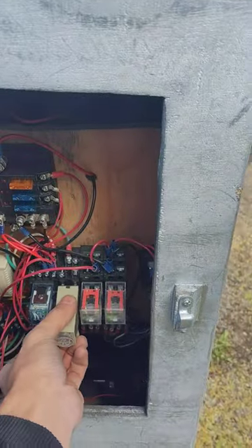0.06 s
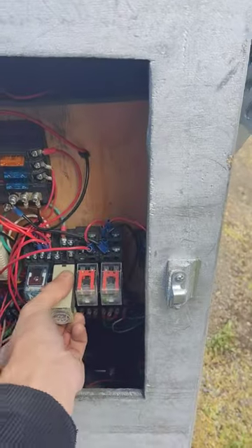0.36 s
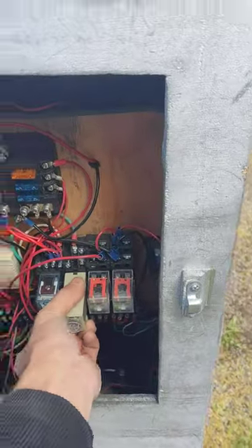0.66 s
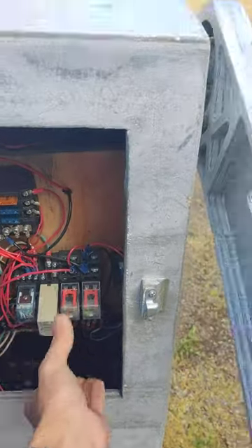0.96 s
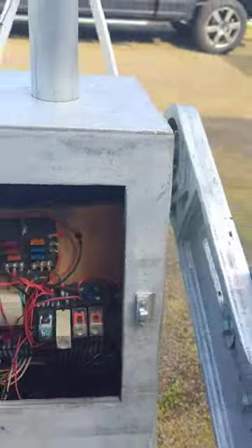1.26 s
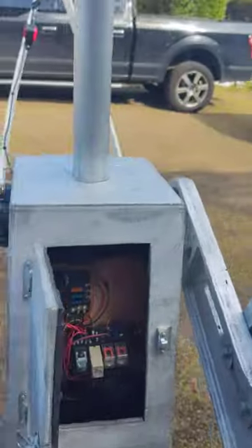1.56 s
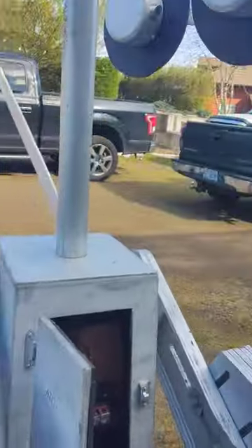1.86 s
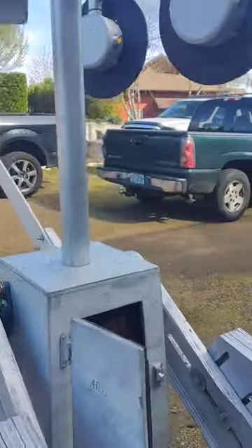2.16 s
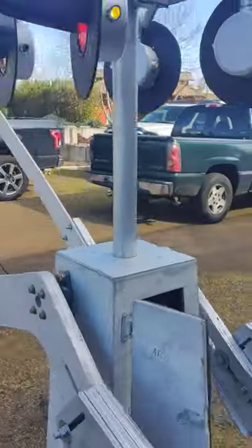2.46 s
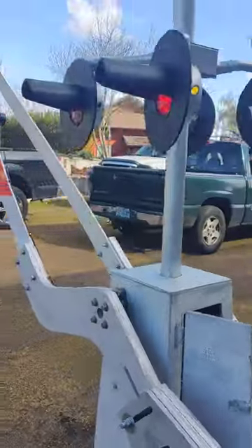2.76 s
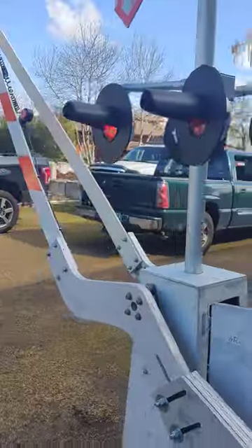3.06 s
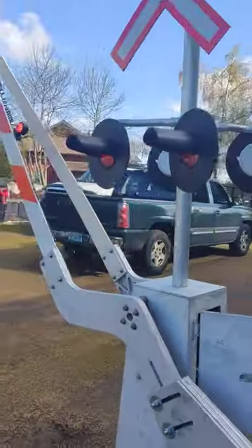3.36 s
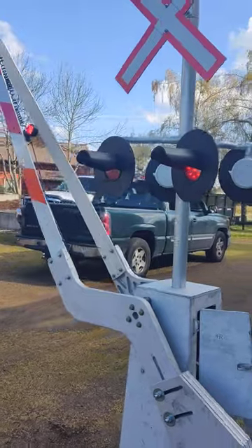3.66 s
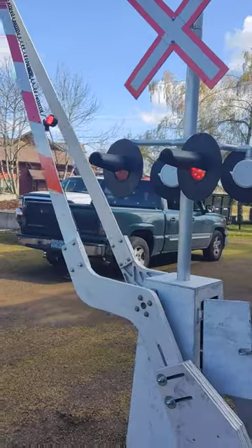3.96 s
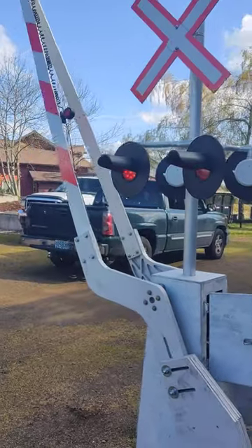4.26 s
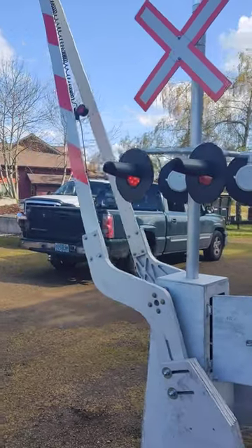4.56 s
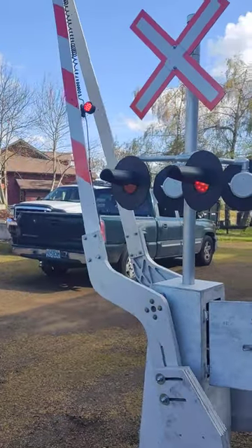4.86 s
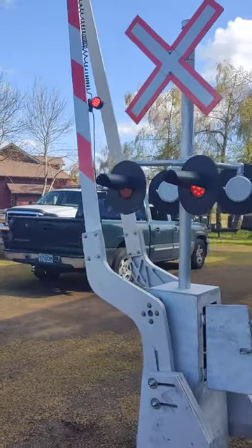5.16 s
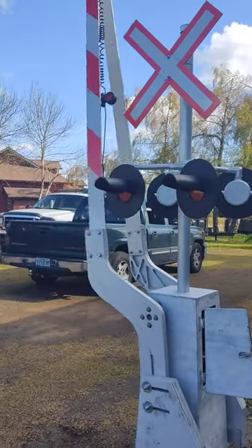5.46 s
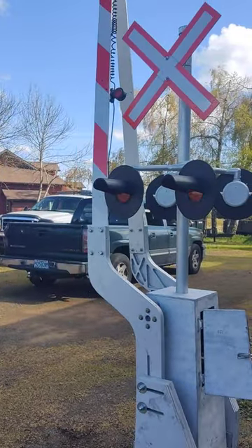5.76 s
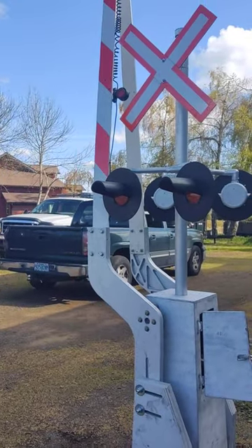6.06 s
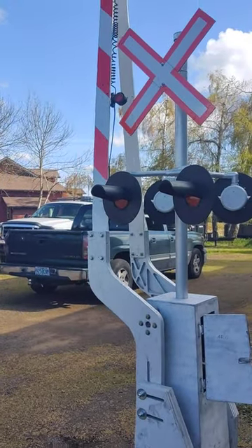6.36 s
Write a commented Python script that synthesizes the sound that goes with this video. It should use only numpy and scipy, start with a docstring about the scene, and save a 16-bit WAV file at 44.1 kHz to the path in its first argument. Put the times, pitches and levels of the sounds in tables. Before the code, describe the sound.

Outdoors, light wind bumps the microphone as a relay starts clicking in an uneven beat. A small geared motor whines, grinds and hisses, sagging twice as it lifts a model crossing gate. The motor and clicks grow fainter as the microphone backs away. Past halfway the dry pivot rubs and squeaks thinly, then the motor stops and the arm knocks softly home.

```python
"""A light wind bumps the microphones throughout, over faint distant outdoor noise.
A flasher relay starts clicking in an uneven beat, and a small linear actuator lifts a model crossing gate.
Its geared motor whines, grinds and hisses, sagging twice under the rocking arm as the listener backs away.
Past halfway the dry pivot rubs and squeaks. A limit switch stops the motor, and the arm knocks home."""
import sys
import numpy as np
from scipy import signal
from scipy.fft import rfft, irfft
from scipy.io import wavfile

SR = 44100
rng = np.random.default_rng(int(sys.argv[2]) if len(sys.argv) > 2 else 0)


def store_wav(level_fs):
    """Save 16-bit WAV to argv[1]."""
    pcm = np.round(np.clip(np.atleast_2d(level_fs), -1, 1) * 32767)
    wavfile.write(sys.argv[1], SR, pcm.T.astype(np.int16))


N = 283061
TIME = np.arange(N) / SR
BIN_HZ = np.fft.rfftfreq(512, 1 / SR)[:, None]
CUT_S = 5.612  # the limit switch opens
# The listener's way from the cabinet (0) to the far spot (1): time_s, share
AWAY = [(1.6, 0.31), (2.3, 0.55), (3.2, 0.62), (3.7, 0.89)]


def amp(db):
    """Decibels to gain."""
    return 10 ** (np.asarray(db) / 20)


def unit(x):
    """Scales to rms 1."""
    return x / np.sqrt(np.mean(x ** 2) + 1e-20)


def curve(rows, t=TIME):
    """The columns of a table at the times t."""
    times, *columns = np.transpose(rows)
    return [np.interp(t, times, c) for c in columns]


def colour(rows, hz):
    """The columns of a table at the frequencies hz."""
    freqs, *columns = np.transpose(rows)
    return [np.interp(np.log(hz + 1), np.log(freqs), c) for c in columns]


def add(mix, start_s, sound):
    """Mixes a stereo sound in."""
    part = mix[:, max(round(start_s * SR), 0):][:, :sound.shape[1]]
    part += sound[:, :part.shape[1]]


def sides(pan_db):
    """Stereo gains of mean power 1; pan_db is left minus right."""
    pair = np.array([amp(pan_db / 2), amp(-pan_db / 2)]).reshape(2, -1)
    return pair / np.sqrt(np.mean(pair ** 2, 0))


def wander(hz):
    """Random drift of rms 1, up to about hz."""
    rolloff = 1 + (np.fft.rfftfreq(N, 1 / SR) / hz) ** 4
    return unit(irfft(rfft(rng.standard_normal(N)) / rolloff, N))


def noise(rows):
    """Noise of rms 1 with a given spectrum."""
    gain = amp(colour(rows, np.fft.rfftfreq(N, 1 / SR))[0])
    return unit(irfft(rfft(rng.standard_normal(N)) * gain, N))


def frames(x):
    """Frame times and short-time spectra."""
    return signal.stft(x, SR, nperseg=512, noverlap=384)[1:]


def sound_of(spectra):
    """Short-time spectra back to sound."""
    return signal.istft(spectra, SR, nperseg=512, noverlap=384)[1][..., :N]


def ring(modes, t, detune=0.028):
    """Dying modes after one blow, each slightly detuned."""
    out = np.zeros(len(t))
    for hz, db, t60 in modes:
        pitch_hz = hz * (1 + detune * rng.standard_normal())
        out += amp(db - 60 * t / t60) * np.sin(2 * np.pi * (pitch_hz * t + rng.random()))
    return out


def envelope(start_s, length_s, rise_s, fall_s):
    """A straight rise, a hold and an exponential release."""
    attack = np.clip((TIME - start_s) / rise_s + .5, 0, 1)
    return attack * np.exp(-np.maximum(TIME - start_s - length_s, 0) / fall_s)


def wind(level_db=-1, lump_db=3, lull_db=-48, gust_db=-31):
    """Lumpy turbulence, unrelated at the two microphones and brighter in gusts."""
    # Breeze between gusts: time_s, level_db, pan_db
    breeze = [(0, -40.5, 1), (1.1, -43.5, 6), (2.0, -37.5, -8.5), (3.0, -43, -15), (3.5, -42.5, -7),
              (4.15, -48.5, -11), (5.4, -45.5, -3.5), (5.85, -53.5, -2.5), (6.42, -53.5, 3)]
    # Gusts on the microphones: start_s, length_s, level_db, pan_db
    gusts = [(0, 0.013, -33.5, 20), (0.193, 0.21, -32.5, 4.5), (0.55, 0.31, -33, 21),
             (1.06, 0.062, -32.5, 11), (1.268, 0.24, -32, -17), (1.524, 0.13, -33.5, -1),
             (1.65, 0.24, -38, -20), (2.185, 0.12, -34, -20), (2.47, 0.31, -30.5, -26),
             (2.798, 0.28, -36.5, -7.5), (3.449, 0.42, -47, -6), (4.536, .06, -42, -30),
             (4.761, .13, -43, -27), (5.25, 0.15, -45, -5), (5.658, 0.033, -41.5, 3),
             (5.884, 0.038, -43, 9)]
    # Colour of the wind: freq_hz, lull_db, gust_db
    tone = [(20, -36, -37), (40, -19, -36), (64, -1.5, -8.5), (87, 6.5, -1.5), (148.3, 4, 0.5),
            (219, -8, -2.5), (346, -29.5, -10.5), (510, -38, -18.5), (840, -45, -43.5),
            (2000, -68.5, -57.5)]
    db, pan_db = curve(breeze)
    power = (amp(db) * sides(pan_db)) ** 2
    for start_s, length_s, db, pan_db in gusts:
        power += (amp(db) * sides(pan_db) * envelope(start_s, length_s, rise_s=0.0083, fall_s=0.041)) ** 2
    strength = np.clip((10 * np.log10(power.mean(0)) - lull_db) / (gust_db - lull_db), 0, 1)
    lull, gust = np.array(tone)[:, [0, 1]], np.array(tone)[:, [0, 2]]
    air = np.zeros((2, N))
    for side in range(2):
        blend = np.sqrt(1 - strength) * noise(lull) + np.sqrt(strength) * noise(gust)
        air[side] = unit(blend * amp(lump_db * wander(42)))
    return amp(level_db) * np.sqrt(power) * air


def outdoors(level_db=-65.5):
    """A faint, steady bed of distant noise."""
    # Colour of the distance: freq_hz, level_db
    tone = [(120, -7), (300, -2.5), (700, -4), (1050, -6), (1550, -8.5), (1930, -4), (2600, -17),
            (4500, -21), (8000, -25), (16000, -28)]
    return amp(level_db) * np.array([noise(tone), noise(tone)])


def buffets(level_db=-1, decay_cycles=0.28):
    """The strongest eddies bump the microphones with single short swings of pressure."""
    # Eddies: centre_s, level_db, pan_db, pitch_hz
    eddies = [(0.171, -20, 26, 135), (0.585, -8, 7, 193), (0.789, -14, 26, 137), (0.88, -14, 32, 122),
              (1.102, -10, 13, 174.7), (1.371, -15, -9, 120), (1.829, -17.5, -29, 174),
              (2.216, -15.5, -15, 232), (2.538, -14, -35, 233), (2.588, -12.5, -29, 250),
              (2.643, -9, -28, 210), (2.71, -19, -26, 126), (2.772, -14.5, -23, 130),
              (3.238, -20.5, -21, 162), (4.571, -20, -17, 120), (4.785, -20.5, -20, 126),
              (5.303, -14, 24, 135), (5.385, -24, 11, 156), (5.8, -28, 10, 163), (5.896, -24, 20, 116.7),
              (6.037, -35.5, 11.5, 137)]
    out, t = np.zeros((2, N)), np.arange(-SR // 20, SR // 20) / SR
    for centre_s, db, pan_db, hz in eddies:
        bump = np.exp(-abs(t) * hz / decay_cycles) * np.sin(2 * np.pi * hz * t)
        polarity = rng.choice([-1, 1], (2, 1))
        add(out, centre_s + t[0], amp(db + level_db) * sides(pan_db) * polarity * bump)
    return out


def relay(level_db=-3, crack_t60=0.037, body_t60=0.072, cabinet_t60=0.4, bounce_s=0.0089, bounce_db=-9):
    """The armature snaps over and bounces once; from afar the cabinet's ring is a larger share."""
    # Relay and switch clicks: start_s, level_db, body_db, pan_db
    clicks = [(.171, -41, -4, -9), (0.189, -28, 0, -5), (.224, -36.5, -4, -17), (0.2416, -21, -14, -9),
              (0.4427, -10.5, -19, -13), (0.9991, -3.5, -35, -7.5), (1.7447, -14, -28, -18),
              (2.2994, -17.5, -18, -14), (3.0225, -31.5, -20, -17), (3.0463, -31, -6, -14),
              (3.6007, -32, -13, -12), (4.346, -41.5, 7.5, -6), (4.898, -35, -13, -11), (5.635, -45, 9, -9)]
    # The relay's ring: pitch_hz, level_db, t60_s
    modes = [(3650, -15, 0.17), (4200, -16, 0.026), (4660, -0.5, 0.021), (5935, -5.5, .03), (6720, -6, .04),
             (9130, -2, .022), (9324, 1.5, 0.041), (10640, -6, 0.034), (14700, -8, 0.024)]
    out, t = np.zeros((2, N)), TIME[:SR // 8]
    bright = signal.butter(2, 3000, "high", fs=SR)
    dull = signal.butter(2, [500, 2500], "band", fs=SR)
    panel = signal.butter(2, [3300, 4600], "band", fs=SR)
    for start_s, db, body_db, pan_db in clicks:
        crack, body, cabinet = rng.standard_normal((3, 2, len(t)))
        away = curve(AWAY, start_s)[0]
        snap = np.array([ring(modes, t), ring(modes, t)]) / 2
        snap += amp(-2 - 60 * t / crack_t60) * signal.lfilter(*bright, crack)
        snap += amp(body_db - 60 * t / body_t60) * unit(signal.lfilter(*dull, body)) / 2
        snap += away ** 2 * amp(-11 - 60 * t / cabinet_t60) * unit(signal.lfilter(*panel, cabinet))
        snap *= amp(db + level_db) * sides(pan_db) * (1 - np.exp(-t / .0005))
        add(out, start_s, snap)
        add(out, start_s + bounce_s, amp(bounce_db) * snap)
    return out


def speed(braking_hz_per_s=240):
    """Shaft turns per second: sways as the arm rocks, less each time, and runs down after the cut."""
    # Turning points of the rocking: time_s, shaft_hz
    turning_points = [(.18, 63.25), (.59, 48.05), (1.22, 68.4), (1.56, 68), (1.99, 54.87), (2.49, 64.64),
                      (2.97, 60.23), (3.21, 62.16), (3.91, 60.5), (4.24, 62.12), (4.98, 60.03),
                      (5.31, 60.62), (5.76, 58.76)]
    times, shaft_hz = np.transpose(turning_points)
    index = np.arange(len(times))
    place = np.interp(TIME, times, index)
    eased = np.floor(place) + (1 - np.cos(np.pi * (place % 1))) / 2
    lost_hz = braking_hz_per_s * np.maximum(TIME - CUT_S, 0)
    return np.maximum(np.interp(eased, index, shaft_hz) - lost_hz, 0)


def load(t, rise_s=.18, fall_s=0.17):
    """How hard the arm bears on the motor: 0 free, 1 labouring."""
    # The arm bears down: start_s, length_s, load_share
    strains = [(.33, 0.63, 0.96), (1.781, 0.38, 0.77), (2.76, .25, 0.2), (4.8, 1, 0.18)]
    return sum(share * np.clip(np.minimum((t - start) / rise_s, (start + length - t) / fall_s) + .5, 0, 1)
               for start, length, share in strains)


def loudness(free_db, load_db, doubling_db):
    """Gain of a motor voice: free_db at 1 m, plus load_db at full load, doubling_db per distance doubling."""
    # The listener backs away: time_s, distance_m
    walk = [(.3, 0.45), (.9, 0.4), (1.6, 0.87), (2.4, 1.01), (3.2, 1.24), (3.7, 1.49), (5.6, 2.3)]
    return amp(free_db + load_db * load(TIME) + doubling_db * np.log2(curve(walk)[0]))


def radiate(drive, tone):
    """Colours a drive by load and distance, keeping its power."""
    t, spectra = frames(drive)
    loaded_db, free_db, far_db = colour(tone, BIN_HZ)
    near_db = free_db + load(t) * (loaded_db - free_db)
    away = curve(AWAY, t)[0]
    gain = amp((1 - away) * near_db + away * far_db)
    return sound_of(spectra * gain / np.sqrt(np.mean(gain ** 2, 0)))


def swell(harmonic):
    """Gain of one harmonic of the whine as echoes lift or cancel it along the walk."""
    # Swells and dips: centre_s, half_length_s, harmonic, gain_db
    swells = [(0.587, 0.049, 3, -5.5), (0.596, 0.058, 4, 1.5), (1.171, 0.17, 5, 9), (1.55, 0.13, 5, -4.5),
              (1.952, .35, 1, -3.5), (2.493, 0.16, 1, 4.5), (2.606, 0.5, 7, 2), (2.994, 0.091, 1, -4.5),
              (3.195, 0.12, 7, 4.5), (3.596, 0.24, 7, -16), (3.853, 0.13, 1, 6.5), (4.3, 0.12, 6, 8),
              (4.34, 0.16, 1, -9.5), (4.8, 0.38, 7, 6.5), (1.151, .1, 1, -7), (1.687, 0.1, 1, -8),
              (2.23, 0.075, 7, 5.5), (0.928, 0.064, 3, 4), (3.255, 0.15, 2, -6)]
    return amp(sum(db * np.exp(-((TIME - centre_s) / half_s) ** 2)
                   for centre_s, half_s, k, db in swells if k == harmonic))


def whine(turns, teeth=12, swing_rad=0.11, flutter=0.42, low_fading_db=0.43, high_fading_db=2.7):
    """Gear teeth mesh; the off-centre pinion swings their timing and force, giving sidebands."""
    # Gearbox response for harmonics 1-3: freq_hz, gain_db
    gearbox = [(570, 1), (640, 3), (735, 2), (820, 5.5), (1140, 0.5), (1270, 1.5), (1450, 3.5), (1650, 5),
               (1720, -3.5), (1900, 5), (2150, 7.5), (2450, 2)]
    # Housing response for the higher harmonics: freq_hz, near_db, far_db
    housing = [(2380, 9, -0.5), (3130, -6, 2.5), (3640, -14, -19), (4040, 3, -5.5), (4600, 0, -0.5),
               (4640, -1.5, -4.5), (4750, -8, 0), (5400, 9.5, 1.5), (5620, 3, -21.5), (6160, -11, -4),
               (6440, -6, -22), (8500, -8.5, -18.5), (10000, -18.5, -14.5)]
    shaft = 2 * np.pi * turns
    slip = (.06 + .05 * load(TIME)) * wander(40)
    mesh = teeth * shaft + swing_rad * np.sin(shaft + 1.1 * wander(4.2)) + slip
    mesh_hz, away = teeth * speed(), curve(AWAY)[0]
    low = loudness(free_db=-53, load_db=24.04, doubling_db=-1.7)
    high = loudness(free_db=-49.5, load_db=2.7, doubling_db=-8)
    force = 1 + 0.064 * np.cos(shaft) + 0.097 * np.sin(2 * shaft)
    shake, fading = wander(83), wander(3)
    out = np.zeros(N)
    for k in range(1, 15):
        rough = flutter * np.roll(shake, rng.integers(N))  # each harmonic shakes on its own
        fade = np.roll(fading, rng.integers(N))  # and swells as reflections shift with the walk
        if k <= 3:
            gain = low * amp(colour(gearbox, k * mesh_hz)[0] + low_fading_db * fade)
        else:
            near_db, far_db = colour(housing, k * mesh_hz)
            gain = high * amp(near_db + away * (far_db - near_db) + high_fading_db * fade)
        out += gain * swell(k) * unit((force + rough) * np.cos(k * mesh + 2 * np.pi * rng.random()))
    return out


def growl(turns, body_hz=535, width_hz=190):
    """Under load each turn jolts the gearbox; shaft orders around the mesh tone rattle its lowest mode."""
    shaft_hz, rattle = speed(), np.zeros(N)
    for order in [9, 10, 11, 13, 14]:
        phase = 2 * np.pi * (order * turns + rng.random()) + .5 * wander(20)
        rattle += np.cos(phase) / np.hypot(1, 2 * (order * shaft_hz - body_hz) / width_hz)
    return loudness(free_db=-62, load_db=22.4, doubling_db=-4) * rattle


def grinding(turns, repeat_share=0.2, throb=0.08, orders=128):
    """Tooth flanks scrape: part of the roughness returns every turn, the rest is new each time."""
    # Colour of the grinding: freq_hz, loaded_db, free_db, far_db
    tone = [(120, -11, -27, -21), (205, 6.5, 7.5, -3.5), (350, -7, -16, -3.5), (560, -0.5, -1.5, -28.5),
            (674, -23.5, 3, -6.5), (919, 0, 5, -38.5), (1264, -21, -1.5, 7), (1530, -12.5, -8, 0),
            (1940, 4, -2, 5.5), (2450, -2, 2, -5.5), (3030, -12.5, -18.5, -10), (3400, -24.5, -11, -20),
            (5160, -0.5, -10.5, 0), (6580, -9.5, -14, -23.5)]
    flank = irfft(np.exp(2j * np.pi * rng.random(orders)) * (np.arange(orders) > 1), 4096)  # one turn
    worn = unit(np.interp(turns % 1, np.arange(len(flank)) / len(flank), flank))
    fresh = rng.standard_normal(N) * (1 + throb * np.cos(2 * np.pi * turns))
    scrape = np.sqrt(repeat_share) * unit(radiate(worn, tone))
    scrape += np.sqrt(1 - repeat_share) * unit(radiate(fresh, tone))
    return loudness(free_db=-40, load_db=6.34, doubling_db=-6) * scrape


def brushes(turns, turn_db=1.2, pole_db=2.0, wheel_db=1.36, flicker_db=1):
    """Brushes hiss on the commutator, pulsing with each turn and with a wheel a third as fast."""
    # Colour of the hiss: freq_hz, loaded_db, free_db, far_db
    tone = [(5800, -15.5, -36, -28), (6480, -12.5, -14, -1.5), (8000, 4.5, -0.5, -24.5),
            (9700, -12, -2.5, 2), (11300, -16.5, -6.5, -4), (12370, -7, 6.5, -15.5),
            (15500, -17, 3.5, -11.5)]
    # Rise and fall of the hiss: time_s, level_db
    levels = [(.26, -40), (.4, -31.5), (.67, -28), (1.02, -32), (1.5, -32), (2.0, -38), (2.5, -46),
              (3.06, -49), (3.43, -55.5), (5.6, -62)]
    shaft = 2 * np.pi * turns
    pulse_db = turn_db * np.cos(shaft) + pole_db * np.cos(2 * shaft) + wheel_db * np.cos(shaft / 3)
    hiss = amp(pulse_db + flicker_db * wander(200)) * rng.standard_normal(N)
    return amp(curve(levels)[0]) * unit(radiate(hiss, tone))


def hum(turns, poles=5, cabinet_hz=338, width_hz=35, waver_db=2.5):
    """The armature poles hum; the cabinet booms when the motor is fast enough to reach its resonance."""
    response = 1 / np.hypot(1, 2 * (poles * speed() - cabinet_hz) / width_hz)
    drone = amp(waver_db * wander(22)) * unit(np.cos(2 * np.pi * poles * turns))
    return loudness(free_db=-48.5, load_db=4, doubling_db=-7.5) * response * drone


def microphones(motor, scatter_t60=0.25):
    """The left microphone hears the motor shaded and shifted in time, mixed with cabinet scatter."""
    # Shading of the left side: freq_hz, pan_db, left_right_likeness
    shading = [(250, 1, 0.69), (640, 0.5, 0.8), (1300, -5, 0.49), (2120, -5.5, 0.13), (3200, -1, 0.33),
               (5000, -3.5, 0.35), (6960, -6.5, 0.63), (8850, -17.5, 0.61), (15100, -13.5, .5)]
    # Direction of the motor: time_s, pan_db, left_lag_ms
    bearing = [(.3, -0.5, -0.15), (1.3, -2.5, -.14), (1.7, -0.5, 0.16), (3.2, -1, 0.17), (3.7, 1.5, 0.32),
               (5.6, 1, 0.27)]
    t = TIME[:SR // 10]
    echoes = rng.standard_normal(len(t)) * amp(-60 * t / scatter_t60)
    whitened = irfft(np.exp(1j * np.angle(rfft(echoes))))
    times, direct = frames(motor)
    scattered = frames(signal.fftconvolve(motor, whitened[:len(t) // 2])[:N])[1]
    shade_db, likeness = colour(shading, BIN_HZ)
    pan_db, lag_ms = curve(bearing, times)
    gain = amp(shade_db + pan_db)
    delay = np.exp(-2j * np.pi * BIN_HZ * lag_ms / 1000)
    left = gain * (likeness * direct * delay + np.sqrt(1 - likeness ** 2) * scattered)
    return sound_of(np.array([left, direct]) / np.sqrt((1 + gain ** 2) / 2))


def actuator(on_s=.245, full_s=0.26, coast_t60=0.17):
    """All the motor's voices follow one shaft, which coasts to rest when the limit switch opens."""
    turns = np.cumsum(speed()) / SR
    running = np.interp(TIME, [on_s, full_s], [0, 1]) * amp(-60 * np.maximum(TIME - CUT_S, 0) / coast_t60)
    motor = whine(turns) + growl(turns) + grinding(turns) + brushes(turns) + hum(turns)
    return microphones(running * motor)


def pivot_rub(level_db=-54, uneven_db=3.5):
    """The dry pivot rubs unevenly partway through the lift."""
    # Colour of the rubbing: freq_hz, level_db
    tone = [(5000, -17), (8000, -7), (9500, -7), (11000, 4), (12200, -12), (13200, -5), (14500, -5),
            (16000, -14)]
    scrape = np.array([noise(tone), noise(tone)]) * amp(level_db + uneven_db * wander(25))
    return envelope(start_s=3.55, length_s=0.53, rise_s=0.17, fall_s=0.4) * sides(pan_db=-15) * scrape


def pivot_squeaks(pitch_hz=12050, t60_s=0.12, attack_s=0.0017):
    """The pivot squeaks thinly on the way up."""
    # Squeaks: start_s, level_db
    squeaks = [(3.742, -35), (3.772, -45), (4.147, -43)]
    out, t = np.zeros((2, N)), TIME[:SR // 4]
    for start_s, db in squeaks:
        squeak = ring([(pitch_hz, db, t60_s)], t, detune=0.0025) * (1 - np.exp(-t / attack_s))
        add(out, start_s, sides(pan_db=-19) * squeak)
    return out


def arm_knocks(thud_db=-7, thud_t60=0.1):
    """The arm rattles against its stop, each knock a thud and a short ring."""
    # Blows on the stop: start_s, level_db
    knocks = [(5.858, -49), (5.867, -45.5), (5.874, -48)]
    # The arm's ring: pitch_hz, level_db, t60_s
    modes = [(533, -1.5, 0.13), (750, -1, 0.078), (1360, -7, 0.099), (2000, -10.5, 0.34),
             (2900, 0.5, 0.047), (3530, -5, 0.042), (4100, -1.5, 0.068), (4100, -5, .08)]
    out, t = np.zeros((2, N)), TIME[:SR // 4]
    for start_s, db in knocks:
        thud = unit(signal.lfilter(*signal.butter(2, 5500, fs=SR), rng.standard_normal((2, len(t)))))
        thud *= amp(thud_db - 60 * t / thud_t60)
        add(out, start_s, amp(db) * sides(pan_db=-4.5) * (ring(modes, t) / 2 + thud))
    return out


def echo(sound, level_db=-24, t60_s=0.35):
    """A faint dull echo from cars and buildings."""
    tail = signal.lfilter(*signal.butter(2, 3000, fs=SR), rng.standard_normal((2, SR)))
    tail *= amp(-60 * TIME[:SR] / t60_s)
    return amp(level_db) * signal.fftconvolve(sound, tail / np.linalg.norm(tail[0]), axes=1)[:, :N]


def scene():
    """The gate's machinery in the open air."""
    gate = actuator() + relay() + pivot_squeaks() + arm_knocks() + pivot_rub()
    return gate + echo(gate) + outdoors() + wind() + buffets()


def record(dry, low_cut_hz=45, high_cut_hz=15950):
    """A gentle low cut and a steep band limit."""
    trimmed = signal.lfilter(*signal.butter(2, low_cut_hz, "high", fs=SR), dry)
    band_limit = signal.firwin(511, high_cut_hz, window=("kaiser", 9), fs=SR)
    return signal.oaconvolve(trimmed, band_limit[None], "same")


dry = scene()
out = record(dry)
store_wav(out)
```